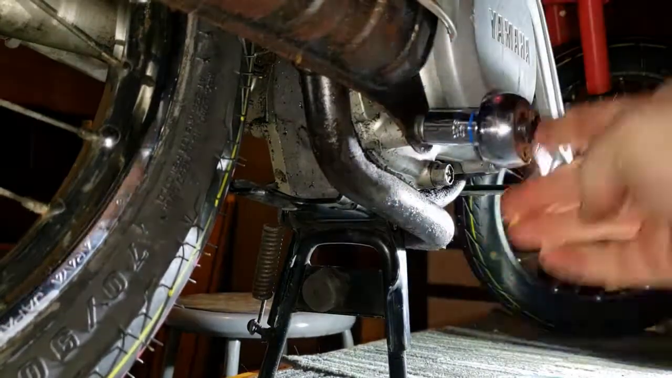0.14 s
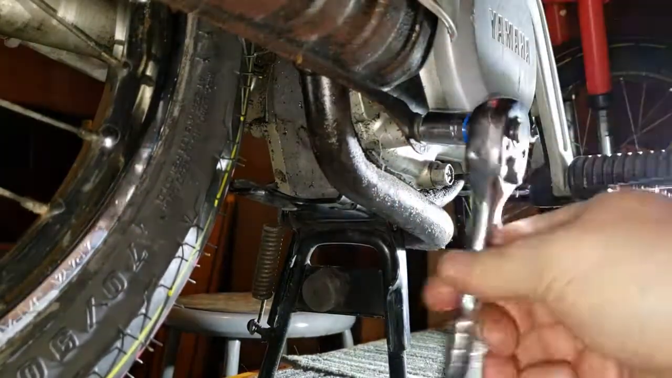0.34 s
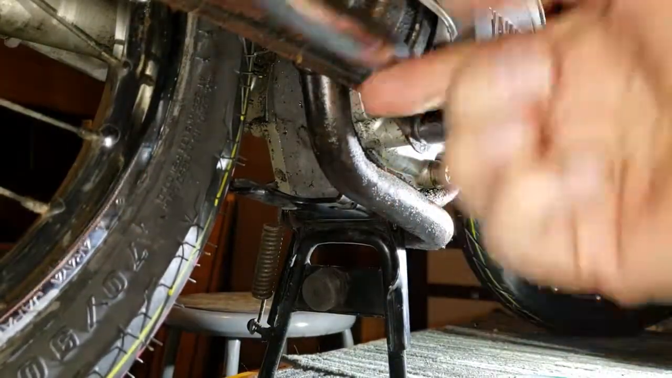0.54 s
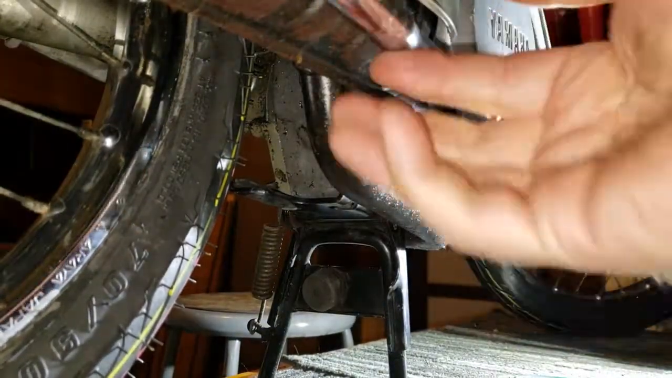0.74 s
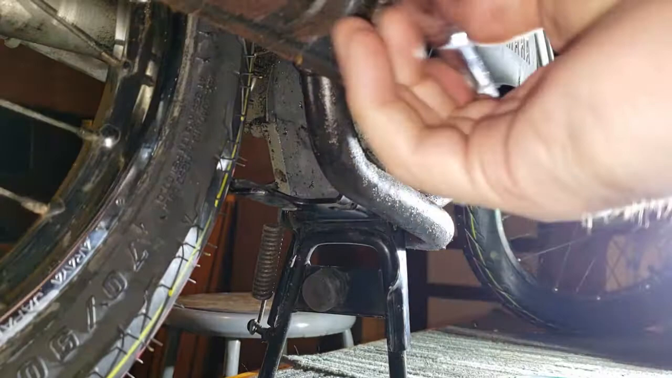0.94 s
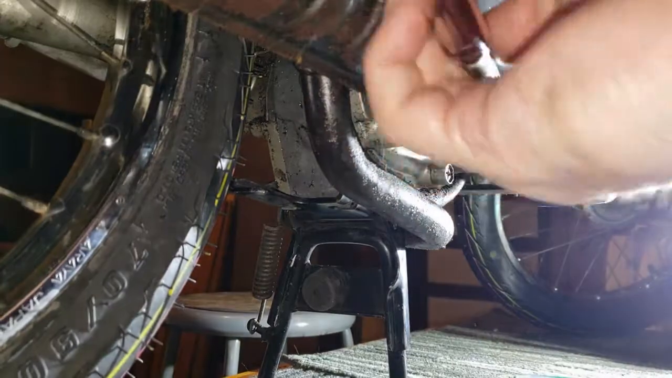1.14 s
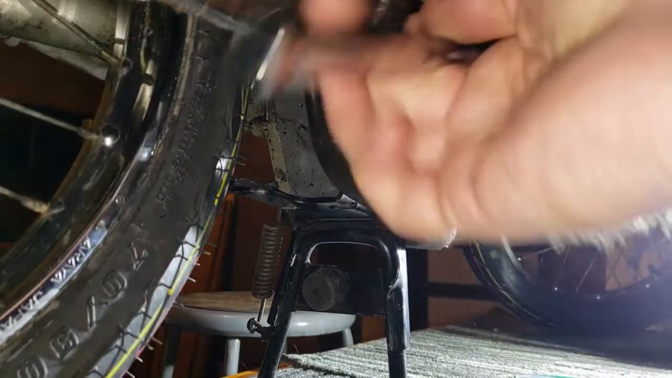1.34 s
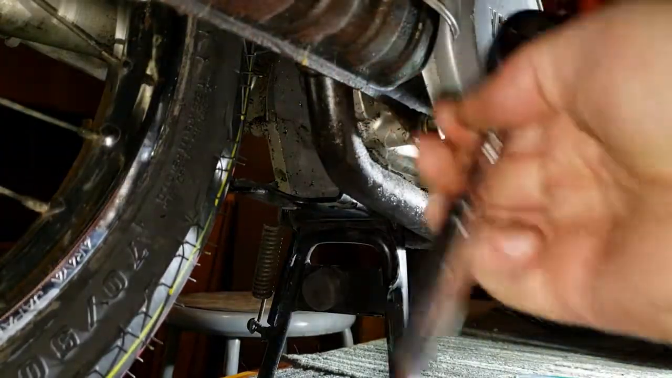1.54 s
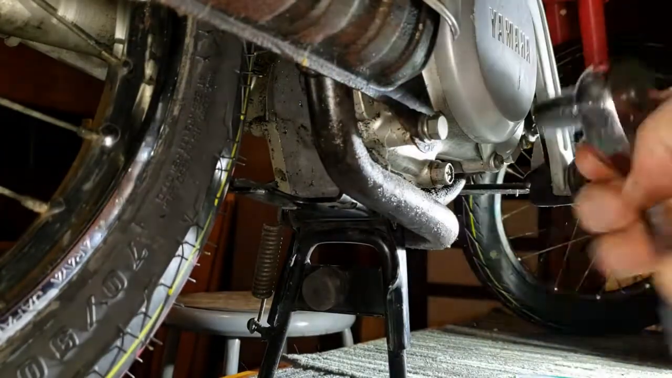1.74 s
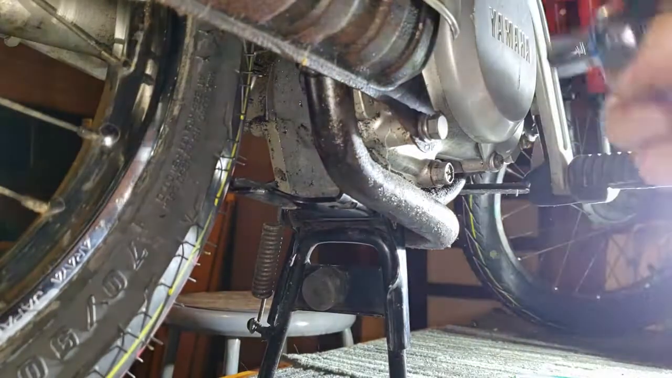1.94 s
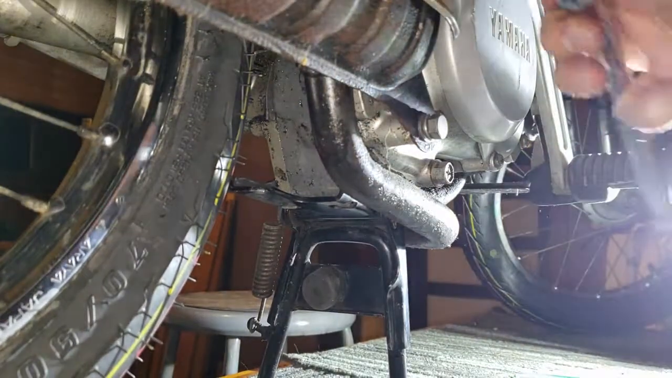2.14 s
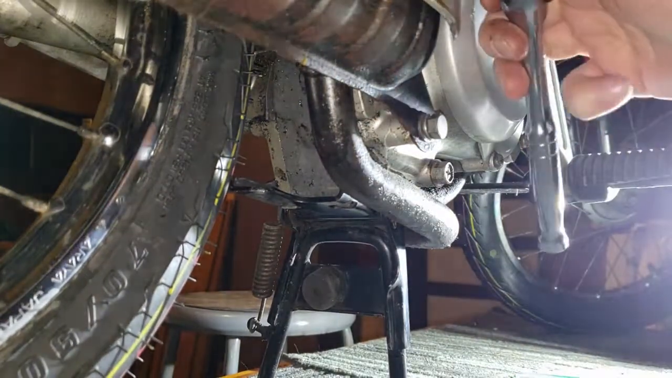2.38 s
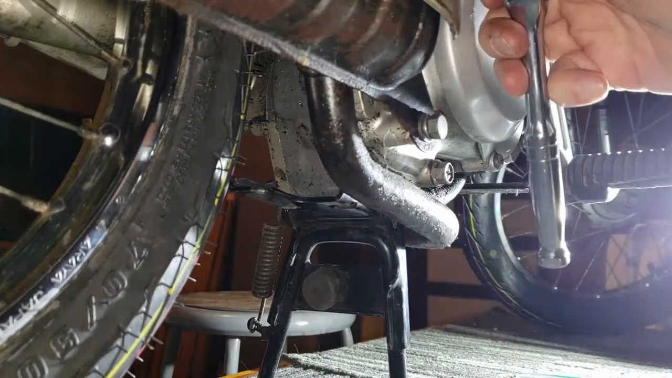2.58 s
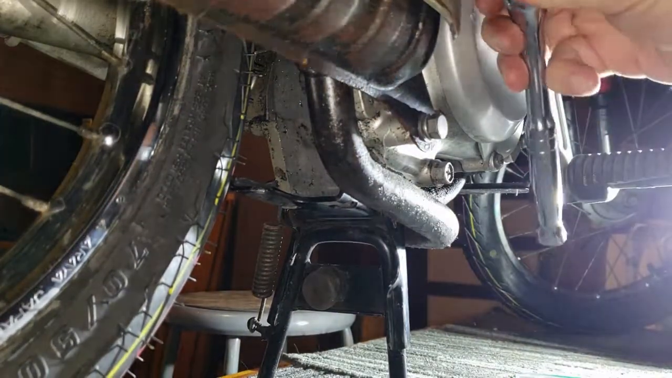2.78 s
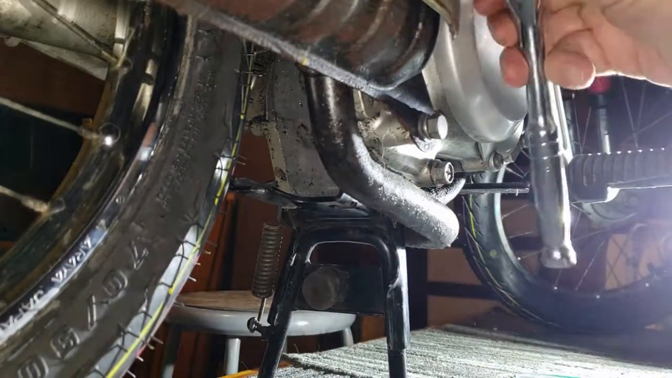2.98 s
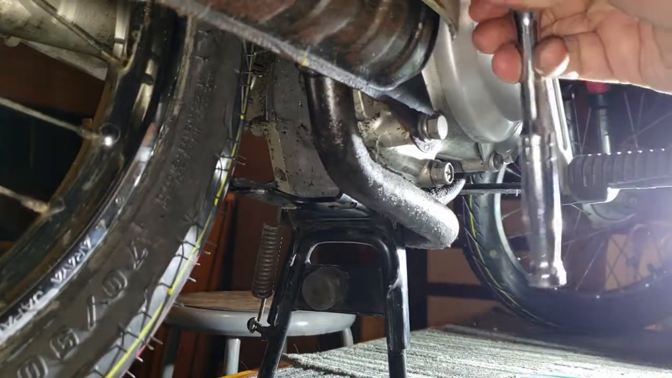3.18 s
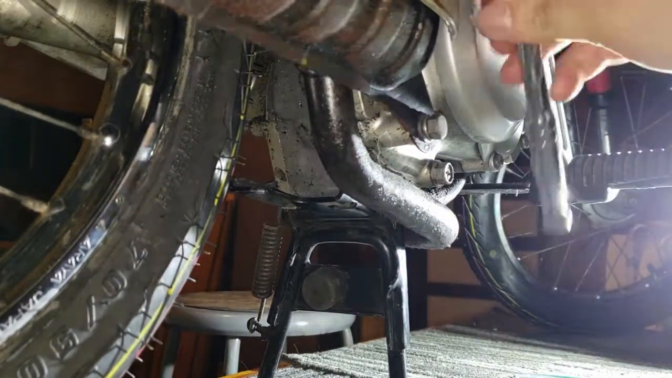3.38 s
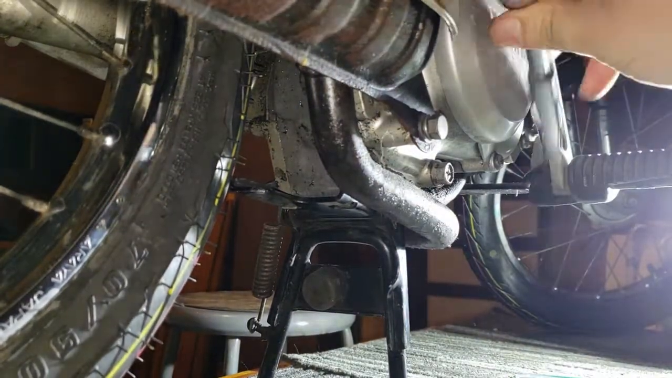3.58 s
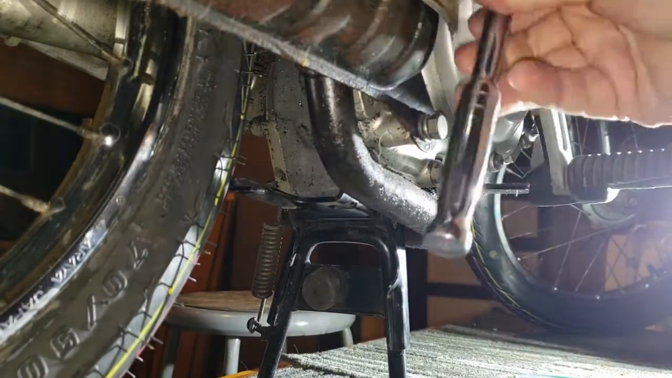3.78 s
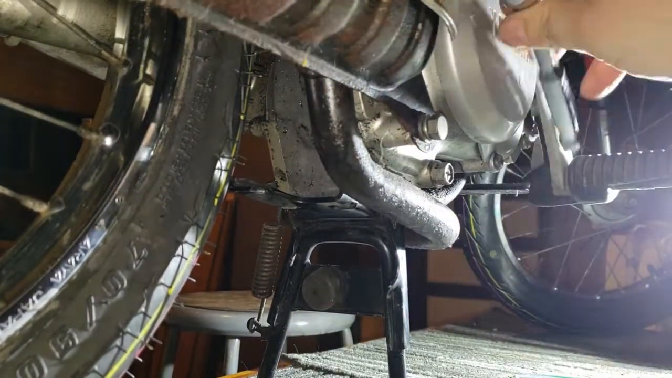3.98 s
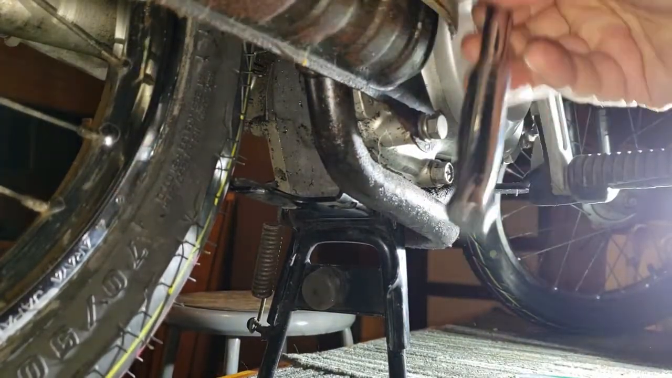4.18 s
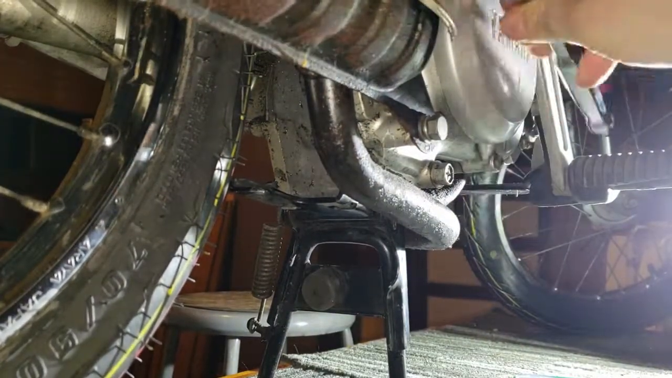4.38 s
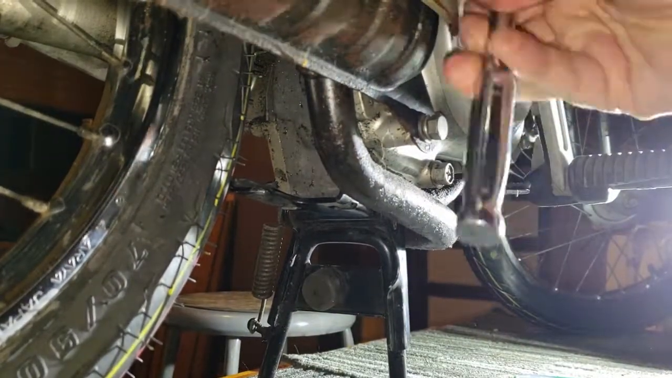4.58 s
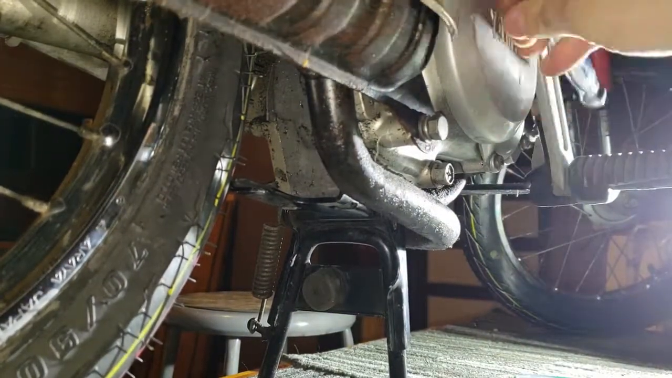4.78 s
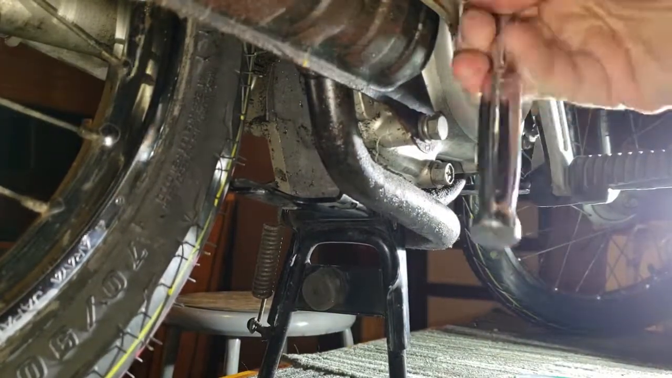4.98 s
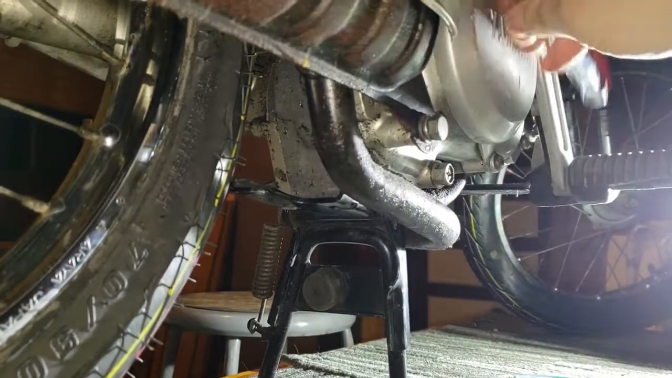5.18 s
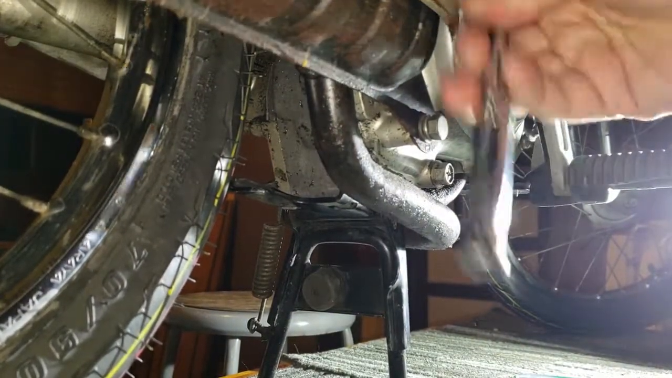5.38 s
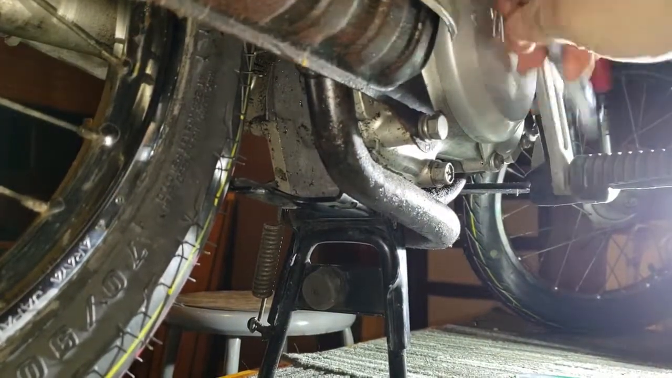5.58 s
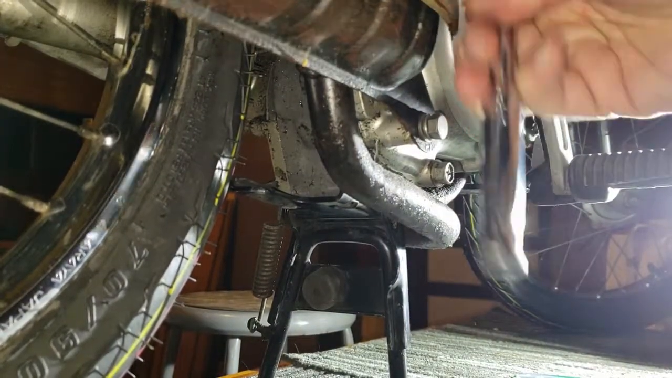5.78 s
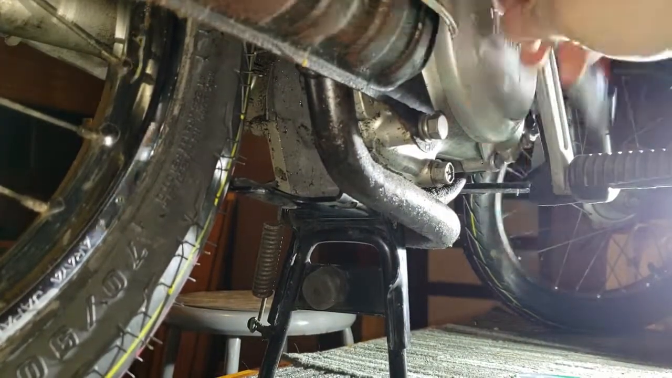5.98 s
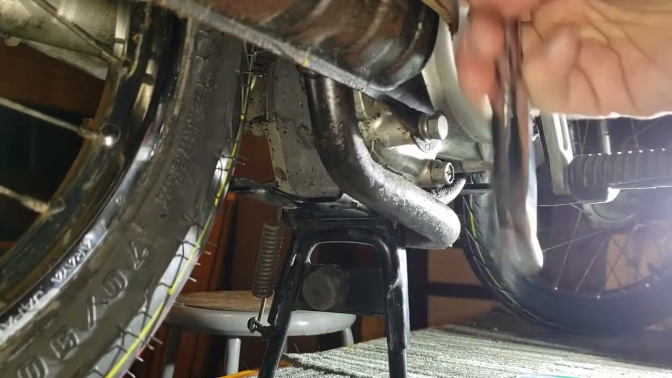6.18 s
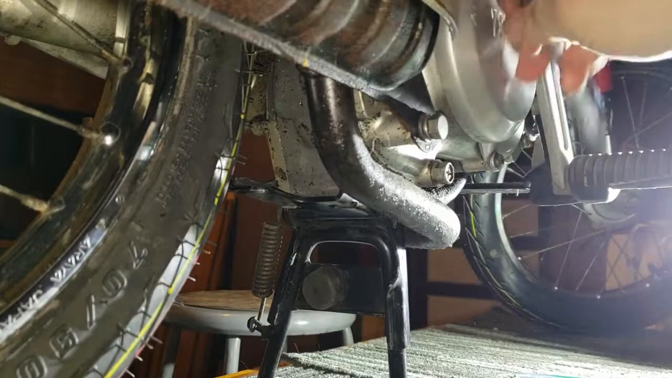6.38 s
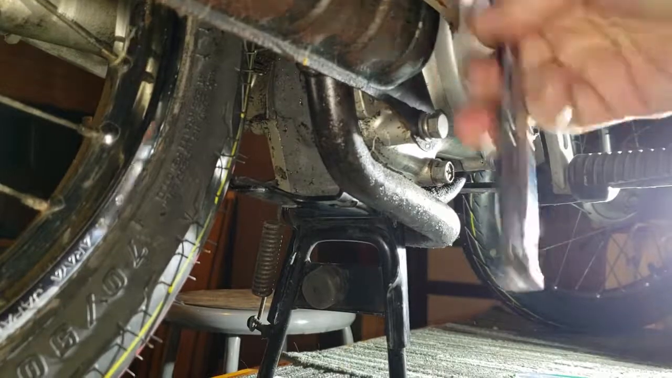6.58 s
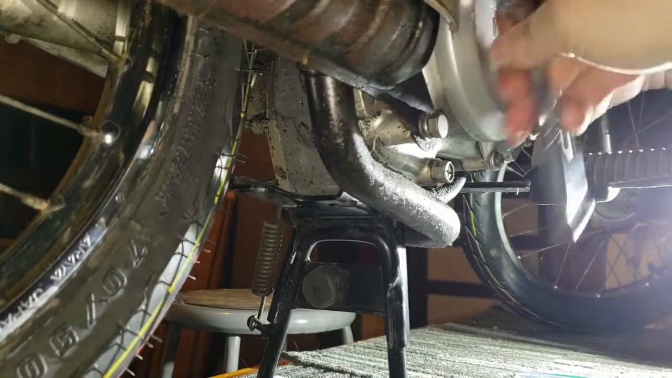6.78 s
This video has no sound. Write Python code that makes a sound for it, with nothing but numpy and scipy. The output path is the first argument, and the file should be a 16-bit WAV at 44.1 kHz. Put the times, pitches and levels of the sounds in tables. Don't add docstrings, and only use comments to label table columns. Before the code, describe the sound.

Metal tool bangs and scrapes against a machine, then a ratchet wrench zips back and forth in quick bright clicks, with a faint low hum behind.

```python
import sys
import numpy as np
from scipy import signal
from scipy.fft import rfft, irfft
from scipy.io import wavfile

SR = 44100
rng = np.random.default_rng(int(sys.argv[2]) if len(sys.argv) > 2 else 0)


def log_audio(samples):
    frames = np.atleast_2d(samples).T
    limited = np.clip(frames, -1, 1)
    pcm = np.round(limited * 32767).astype(np.int16)
    wavfile.write(sys.argv[1], SR, pcm)


def undo_db(level):
    steps = np.asarray(level, float) / 20
    return 10 ** steps


N = 301203


def rms_one(x):
    return x / np.sqrt(np.mean(x ** 2) + 1e-20)


def in_time(rows):
    s, *columns = np.transpose(rows)
    return [np.interp(np.arange(N) / SR, s, c) for c in columns]


def at_hz(points, hz):
    point_hz, value = np.transpose(points)
    return np.interp(np.log(hz + 1), np.log(point_hz), value)


def band(x, low_hz, high_hz):
    edges_hz = [low_hz, min(high_hz, .45 * SR)]
    return signal.sosfilt(signal.butter(2, edges_hz, "band", fs=SR, output="sos"), x)


def drift(rate_hz):
    slow = signal.butter(2, rate_hz, fs=SR, output="sos")
    return rms_one(signal.sosfilt(slow, rng.standard_normal(N)))


def ring(force, modes):
    out = np.zeros((2, N))
    for hz, level_db, t60 in modes:
        r, w = undo_db(-60 / (t60 * SR)), 2 * np.pi * hz / SR
        poles = signal.lfilter([undo_db(level_db)], [1, -2 * r * np.cos(w), r * r], force + 1e-18)
        for side, phase in enumerate(rng.uniform(0, 2 * np.pi, 2)):
            out[side] += signal.lfilter([np.sin(phase), r * np.sin(w - phase)], [1], poles[side])
    return out


def contacts(times, level_db, pan_db, chatter_s, share, apart):
    length = 900
    out, t = np.zeros((2, N + length)), np.arange(length) / SR
    marks = rng.random((len(times), length))
    signs = rng.standard_normal((len(times), 3, length))
    onset = 1 - np.exp(-(t + 1 / SR) / .0007)
    shapes = onset * np.exp(-t / (chatter_s * np.ones(len(times)))[:, None])
    own = np.clip(apart, 0, 1)
    for s, db, pan, mark, sign, shape in zip(times, level_db, pan_db, marks, signs, shapes):
        impacts = np.sqrt(1 - own) * sign[0] + np.sqrt(own) * sign[1:]
        burst = impacts * (mark < share) * shape
        burst /= np.linalg.norm(burst, axis=1, keepdims=True) + 1e-9
        start = round(s * SR)
        out[:, start:start + length] += undo_db(db + np.array([[pan / 2], [-pan / 2]])) * burst
    return out[:, :N]


# (t/s, f/Hz, level/dB)
HUM = [(0, 59.17, -62), (.7, 55, -62), (1.7, 52, -62.5), (3.3, 51.85, -60.5), (3.55, 52.9, -58.5),
       (3.7, 56.55, -68.5), (4.9, 59.87, -67.5), (5.3, 64, -60.5), (5.62, 65.6, -60), (5.71, 61.5, -104),
       (5.82, 66.8, -63), (6.6, 65.66, -59.5), (6.83, 60, -57)]
# (t/s, level/dB)
RUMBLE_LEVEL = [(0.0, -51), (0.42, -53), (0.8, -53), (0.97, -58.5), (2.07, -59.5), (2.53, -59.5),
                (3.04, -51.5), (4.34, -54), (5.21, -56.5), (6.83, -55)]
# (f/Hz, level/dB per Hz)
RUMBLE = [(20, -38), (40, -16), (62, -10), (85, -13.5), (120, -10), (245, -3), (450, -11.5), (560, -5.5),
          (645, -1.5), (710, -12.5), (870, -13), (1050, -19.5), (1800, -27.5), (3500, -34)]
# (f/Hz, likeness/0..1)
LIKENESS = [(60, 1), (130, 1), (290, 0.35), (640, 0.51), (1400, 0.)]
# (f/Hz, level/dB per Hz)
AIR = [(1200, -2), (2500, -9.5), (5000, -2), (8500, -12), (12500, -6.5), (16000, -5.5)]
AIR_DB = -70


def rumble():
    hz = np.fft.rfftfreq(N, 1 / SR)
    mid, side = rfft(rng.standard_normal((2, N))) * undo_db(at_hz(RUMBLE + [(SR / 4, -90)], hz))
    alike = np.clip(at_hz(LIKENESS, hz), -1, 1)
    low = irfft(np.sqrt(1 + alike) * mid + np.sqrt(1 - alike) * side * [[1], [-1]], N)
    low_db = in_time(RUMBLE_LEVEL)[0] + 3.5 + 2.1 * drift(2.9)
    low = rms_one(low) * undo_db(low_db) * undo_db([[.7], [-.7]])
    air = irfft(rfft(rng.standard_normal((2, N))) * undo_db(at_hz([(300, -40)] + AIR, hz)), N)
    air = rms_one(air) * undo_db(AIR_DB + 0.56 * drift(3.6))
    hum_hz, hum_db = in_time(HUM)
    phase = 2 * np.pi * np.cumsum(hum_hz + 1.5 * drift(3)) / SR
    hum = np.sqrt(2) * undo_db(hum_db + 0.73 * drift(3.3)) * np.sin(phase)
    return low + air + hum


# (f/Hz, t60/s)
ROOM_T60 = [(250, 0.66), (700, 0.47), (1500, 0.37), (3000, 0.3), (6000, 0.21), (12000, 0.13)]


def workshop(x, near_db, walls_db):
    t = np.arange(SR // 2) / SR
    noise = rng.standard_normal((2, 2, len(t)))
    near = band(noise[0], 500, 19000) * np.exp(-t / .007)
    walls = sum(band(noise[1], hz / 1.7, hz * 1.5) * undo_db(-60 * t / t60) for hz, t60 in ROOM_T60)
    walls = walls * (t > .006)
    reply = undo_db(near_db) * near / np.linalg.norm(near[0])
    reply += undo_db(walls_db) * walls / np.linalg.norm(walls[0])
    return signal.fftconvolve(x, reply, axes=1)[:, :N]


# (full t/s, eases t/s, fade/s, hiss level/dB, scrape level/dB)
SLIDES = [(0, .1, .1, -74, -67), (0.277, 0.357, 0.11, -80, -63.5), (.91, 0.942, .035, -58.5, -54),
          (1.02, 1.035, 0.069, -63.5, -61), (1.435, 1.446, .04, -53.5, -52.5),
          (1.46, 1.5, .012, -60.5, -65), (1.8, 1.84, .08, -73.5, -74.5), (1.998, 2.143, 0.0595, -63, -64.5),
          (2.62, 2.79, 0.093, -74, -67), (2.806, 2.891, 0.016, -43.5, -61.5),
          (2.91, 2.95, 0.097, -49.5, -58), (3.014, 3.05, 0.079, -52, -62),
          (3.119, 3.166, 0.047, -52.5, -52.5), (3.218, 3.246, .14, -69, -65),
          (3.815, 3.865, 0.066, -61, -58.5), (4.771, 4.778, 0.033, -48, -53),
          (5.153, 5.173, 0.015, -54, -61), (5.528, 5.538, .03, -46.5, -57)]
# (full t/s, hiss level/dB, scrape level/dB)
REGRIPS = [
    (5.091, -48, -66),
    (5.468, -40.5, -47),
    (5.858, -44.5, -53),
    (6.23, -41.5, -47),
    (6.598, -42, -45.5),
]
REGRIP_HOLD_S, REGRIP_FADE_S, RISE_OVER_FADE = 0.018, 0.042, 0.63


def rubbing():
    t, hiss_power, scrape_power = np.arange(N) / SR, np.zeros(N), np.zeros(N)
    regrips = [(s, s + REGRIP_HOLD_S, REGRIP_FADE_S, hiss_db, scrape_db) for s, hiss_db, scrape_db in REGRIPS]
    for full_s, eases_s, fade_s, hiss_db, scrape_db in SLIDES + regrips:
        eases_s = max(eases_s, full_s)
        moments = [full_s - RISE_OVER_FADE * fade_s, full_s, eases_s, eases_s + fade_s]
        swell = undo_db(np.interp(t, moments, [-40, 0, -4, -44], left=-180, right=-180))
        hiss_power += undo_db(2 * hiss_db) * swell
        scrape_power += undo_db(2 * scrape_db) * swell
    noise = rng.standard_normal((3, 2, N))
    bright = band(noise[0], 10500, 18500) + undo_db(-4) * band(noise[2], 6000, 10500)
    hiss = rms_one(bright) * np.sqrt(hiss_power) * undo_db(-2.5 + 2.3 * drift(50))
    scrape = rms_one(band(noise[1], 1300, 5000)) * np.sqrt(scrape_power) * undo_db(-3.5 + 1.7 * drift(60))
    return hiss + scrape


# (t/s, peak level/dB, pitch f/Hz, thud over peak/dB, left over right/dB)
BLOWS = [(0.6946, -6.5, 3350, -10.5, -5), (0.7047, -13, 2860, -9, 12), (0.7118, -14, 4850, -9.5, 0.5),
         (0.7234, -3.5, 2120, -13, -2.5), (0.7389, -4.5, 2380, -23, 0), (0.744, -4, 2565, -16.5, 3.5),
         (0.7547, -10, 2292, -18, -4), (0.7674, -12.5, 2563, -11, 5.5), (0.776, -21.5, 2507, -6, 8.5),
         (0.9397, -28.5, 2320, -18, 2), (0.9506, -37.5, 2600, -14.5, 3), (1.4985, -2, 1085, -22.5, 1.5),
         (2.4605, -27, 6050, -33, -4.5), (3.6622, -25.5, 1376, -13, 0), (3.7391, -28.5, 1387, -28, -0.5),
         (3.8257, -33.5, 1126, 5.5, 0)]
BLOW_EDGE_DB, EDGE_LOSS_DB_PER_OCTAVE = -10.5, 2.5
# (t/s, peak level/dB, pitch f/Hz, edge over peak/dB)
TICKS = [(0.0352, -43, 4480, -28), (0.3107, -42, 1320, -14), (0.3297, -49, 1150, -29.5),
         (0.5285, -47.5, 2940, -33), (1.029, -53.5, 2620, -16), (1.1094, -50.5, 1200, -23),
         (1.4376, -44.5, 2430, -5), (1.8904, -59, 4900, -21.5), (2.0963, -57.5, 1920, -12),
         (2.1494, -52, 1150, -8.5), (2.1974, -58, 4650, -24), (2.2817, -53, 1670, -1),
         (2.4007, -57.5, 6510, -3.5), (2.4852, -32, 2140, -15), (2.5822, -42, 2740, -28),
         (2.6557, -40, 1400, -35.5), (3.139, -37, 1290, -3), (4.3321, -46, 1300, -18.5),
         (4.3625, -38.5, 1300, -16), (4.9702, -32.5, 5360, -1), (5.353, -32, 1450, -6),
         (5.7403, -34, 1380, -23), (6.1268, -34.5, 4840, -6), (6.291, -36.5, 4830, -4),
         (6.5003, -34.5, 2170, -10), (6.6324, -33.5, 1420, -14), (6.663, -43, 4890, -4)]
TICK_THUD_DB, TICK_PAN_DB = -11.5, -2.5


def knock_rows():
    blows = []
    for s, db, hz, thud_db, pan in BLOWS:
        edge_db = BLOW_EDGE_DB - EDGE_LOSS_DB_PER_OCTAVE * np.log2(hz / 2000)
        blows.append((s, db, hz, thud_db, edge_db, pan))
    ticks = [(s, db, hz, TICK_THUD_DB, edge_db, TICK_PAN_DB) for s, db, hz, edge_db in TICKS]
    return np.transpose(blows + ticks)


# (f/Hz, level/dB, t60/s)
FRAME = [(1125, -4.5, .05), (1170, -16, .09), (1666, -16, .07), (1999, -13, .07), (2290, -14, 0.067),
         (2480, -13, .05), (3200, -14, .04), (4430, -13, 0.058), (4900, -11, 0.11), (5300, -15, 0.044),
         (6050, -14.5, .04), (10000, -20.5, .04)]
CRACK_BANDS_HZ = [900, 1800, 2900, 4600, 7500]
# (f/Hz, level/dB, t60/s)
STAND = [(2530, -13, 0.28)]
# (from t/s, to t/s)
STAND_STRUCK_S = (0.55, 0.99)
BLOW_CHATTER_S = .0034


def knocks():
    s, peak, pitch_hz, thud, edge, pan = knock_rows()
    dull = contacts(s, peak + thud, pan * .3, chatter_s=0.0088, share=0.15, apart=0.17)
    sharp = contacts(s, peak + edge, pan, chatter_s=0.0035, share=0.18, apart=.8)
    out = undo_db(30.5) * band(dull, 100, 880) + undo_db(20.5) * band(sharp, 11000, 17500)
    for low_hz, high_hz in zip(CRACK_BANDS_HZ, CRACK_BANDS_HZ[1:]):
        octaves_off = np.abs(np.log2(np.maximum(pitch_hz, 1500) / np.sqrt(low_hz * high_hz)))
        blow = contacts(s, peak - 5.0 * octaves_off, pan, chatter_s=BLOW_CHATTER_S, share=0.45, apart=0.69)
        out += undo_db(20.5) * band(blow, low_hz, high_hz)
        out += undo_db(-10.0) * ring(blow, [mode for mode in FRAME if low_hz <= mode[0] < high_hz])
    t = np.arange(N) / SR
    struck = (t > STAND_STRUCK_S[0]) * (t < STAND_STRUCK_S[1])
    stand = ring(blow * struck, STAND)
    return out + undo_db(-2.5) * ring(sharp, FRAME[-1:]) + undo_db(-2.0) * stand


# (t/s, bright level/dB, head ring over bright/dB)
SLOW_DROPS = [(2.9, -30, 2.5), (3.4847, -23.5, -5), (3.5064, -19.5, -9.5), (3.5224, -16, -13),
              (3.539, -24, 5.5), (3.555, -16, -18), (3.571, -22, -4), (3.5872, -19.5, -21),
              (3.6036, -19, -7.5), (3.6223, -20.5, -27.5), (3.6448, -21.5, 0.5)]
# (first drop t/s, last drop t/s, bright level/dB, body over bright/dB, last-gap stretch/ratio)
STROKES = [
    (4.0057, 4.136, -18.5, -3, .55),
    (4.3893, 4.507, -19.5, -2, 1.3),
    (4.7812, 4.9098, -19, -4, .4),
    (5.1755, 5.3045, -20.5, -2, 0.53),
    (5.5486, 5.678, -18.5, -5.5, .9),
    (5.936, 6.0843, -18.5, -5, 0.088),
    (6.3045, 6.443, -19.5, -3.5, .3),
    (6.6834, 6.8229, -19, -5.5, 0.014),
]
TEETH_PER_STROKE = [11, 10, 11, 13, 11, 13, 14, 13]
SLOWING_TEETH, GAP_SCATTER_S, SLOW_BODY_DB = 1.1, 0.00082, -1.5
STROKE_ENDS_DB, HEAD_DB = -1.5, -6
BRIGHT_SCATTER_DB, BODY_SCATTER_DB, HEAD_SCATTER_DB = 1, 2.5, 4
BODY_IGNORES = 0.94
REBOUND_CHANCE, REBOUND_S, REBOUND_DB = .35, .0055, -2
HEAD_GAIN_DB_PER_S = 1.06


def pawl_drops():
    rows = [(s, db, SLOW_BODY_DB - BODY_IGNORES * (db + 21.5), head_db) for s, db, head_db in SLOW_DROPS]
    for (first_s, last_s, db, body_db, stretch), teeth in zip(STROKES, TEETH_PER_STROKE):
        gaps = 1 + stretch * np.exp(-np.arange(teeth - 1)[::-1] / SLOWING_TEETH)
        run = np.append(0, np.cumsum(gaps)) / gaps.sum()
        luck = rng.standard_normal((teeth, 4))
        twice = rng.random(teeth) < REBOUND_CHANCE
        inside = np.sin(np.pi * run) > .01
        s = first_s + run * (last_s - first_s) + GAP_SCATTER_S * luck[:, 0] * inside
        surplus = BRIGHT_SCATTER_DB * luck[:, 1]
        bright = db + surplus + STROKE_ENDS_DB * run ** 3
        body = body_db - BODY_IGNORES * surplus + BODY_SCATTER_DB * luck[:, 2]
        head = HEAD_DB + HEAD_GAIN_DB_PER_S * (s - 5) - surplus + HEAD_SCATTER_DB * luck[:, 3]
        drops = np.c_[s, bright, body, head]
        rebounds = drops[twice] + [REBOUND_S, REBOUND_DB, 0, REBOUND_DB]
        rows += list(drops) + list(rebounds)
    return np.transpose(sorted(map(tuple, rows)))


# (f/Hz, level/dB, t60/s)
BODY_MODES = [(1420, -21, 0.032), (2190, -12, 0.012), (2860, -23.5, 0.0067), (3770, -18.5, 0.005),
              (4250, -9, 0.0097), (4846, -8.5, 0.034), (4600, -9.5, 0.0085), (5170, -6.5, 0.014),
              (5990, -18.5, .012)]
# (f/Hz, level/dB, t60/s)
BRIGHT_MODES = [(12900, -23, 0.015), (14600, -6, .007), (16200, -6, .008), (15600, -4.5, .01)]
# (f/Hz, level/dB, t60/s)
RING_MODES = [(9810, -1.9, 0.04), (9835, -1.8, 0.031)]
# (t since the stroke began/s, left over right/dB)
SWING = [(0, -0.5), (.05, -2.5), (.15, -3)]
PAWL_CHATTER_S = .002
GRIP_WANDER_DB = 4.5
DULLING_DB_PER_S = 34


def ratchet():
    s, bright, body, head = pawl_drops()
    began = np.maximum.accumulate(s * (np.diff(s, prepend=0) > .1))
    pan = np.interp(s - began, *np.transpose(SWING))
    gap_s = signal.medfilt(np.diff(s, append=s[-1] + .011), 7)
    chatter_s = PAWL_CHATTER_S * np.clip((.016 / gap_s) ** 2.2, .75, 2.4)
    tip_db = DULLING_DB_PER_S * (s - began - .07)
    top = contacts(s, bright, pan, chatter_s=chatter_s, share=0.64, apart=1.0)
    low = contacts(s, bright + body - 0.3 * tip_db, pan * 0.2, chatter_s=1.7 * chatter_s, share=.25, apart=0.88)
    dull = contacts(s, bright + body + tip_db, pan * .25, chatter_s=3.2 * chatter_s, share=.25, apart=0.67)
    long = contacts(s, bright + head, pan * 0.23 + 0.44, chatter_s=0.69 * chatter_s, share=.5, apart=0.5)
    crack = undo_db(16.0) * band(top, 8000, 18000)
    crack += undo_db(14.5) * band(dull, 1130, 3580)
    crack += undo_db(18.0) * band(low, 4600, 7440)
    crack += undo_db(15.5 + GRIP_WANDER_DB * drift(9.3)) * band(low, 2600, 4200)
    rings = undo_db(8.0) * ring(top, BRIGHT_MODES) + undo_db(3.5) * ring(low, BODY_MODES) + undo_db(3) * ring(long, RING_MODES)
    return crack + rings


def scene():
    clicks, blows = ratchet(), knocks()
    clicks = clicks + workshop(clicks, near_db=-9.5, walls_db=-13)
    blows = blows + workshop(blows, near_db=-5.0, walls_db=-11)
    return rumble() + rubbing() + blows + clicks


def top_cut(x):
    return signal.sosfilt(signal.butter(12, 17150, fs=SR, output="sos"), x)


CUTOFF_HZ = 15700


def record(dry):
    cut = signal.sosfilt(signal.cheby2(10, 26, CUTOFF_HZ * 1.019, fs=SR, output="sos"), dry)
    cut = signal.sosfilt(signal.cheby2(12, 60, 17400, fs=SR, output="sos"), cut)
    mix = np.clip(cut, -1, 1)
    return top_cut(mix)


dry = scene()
out = record(dry)
log_audio(out)
```